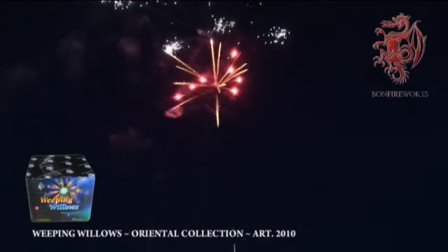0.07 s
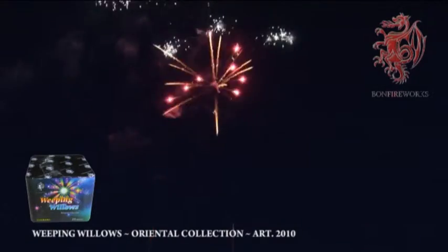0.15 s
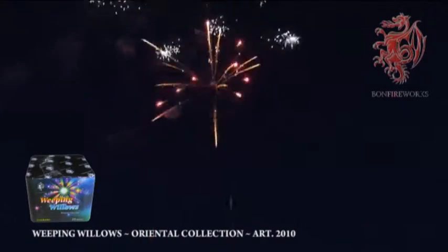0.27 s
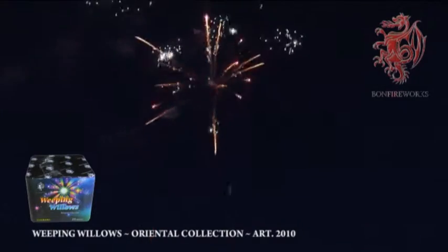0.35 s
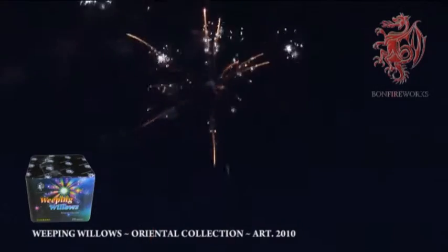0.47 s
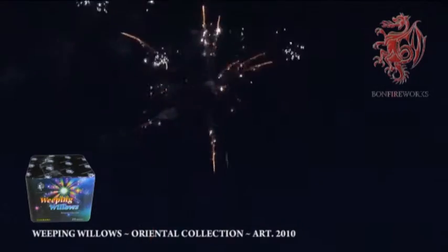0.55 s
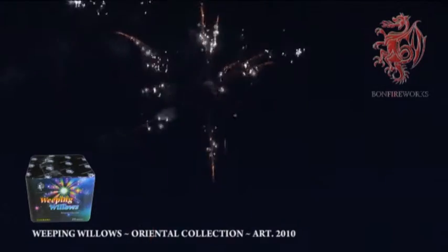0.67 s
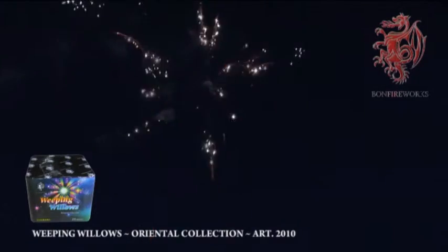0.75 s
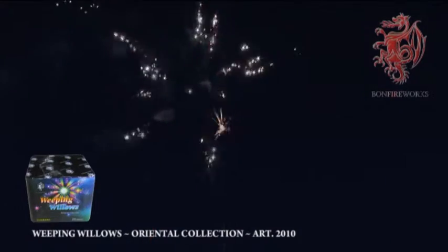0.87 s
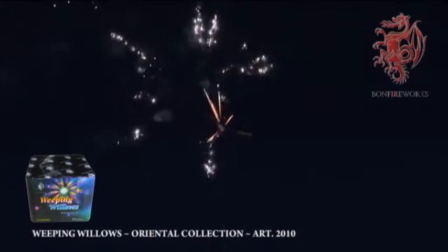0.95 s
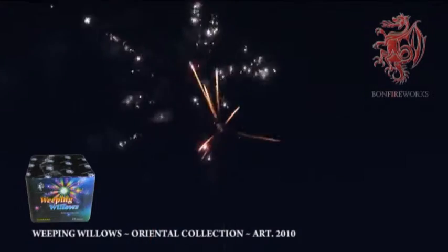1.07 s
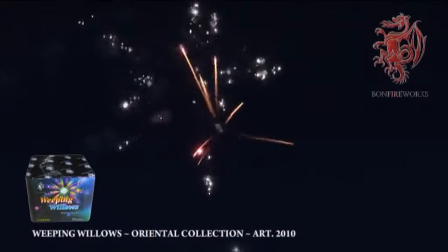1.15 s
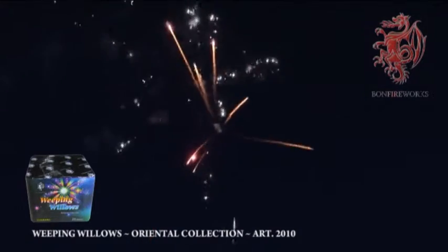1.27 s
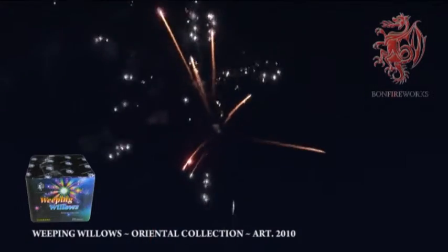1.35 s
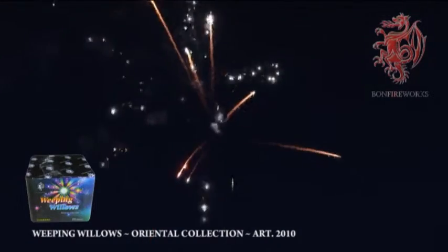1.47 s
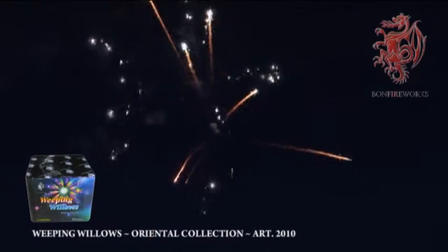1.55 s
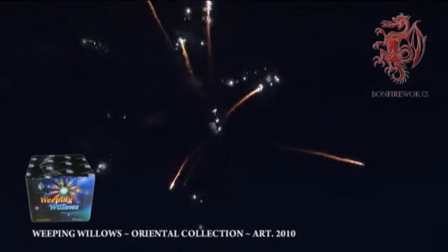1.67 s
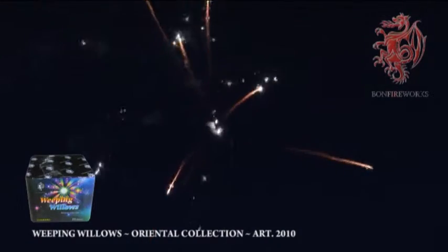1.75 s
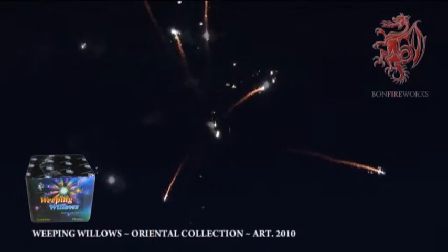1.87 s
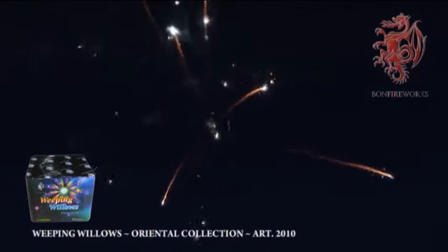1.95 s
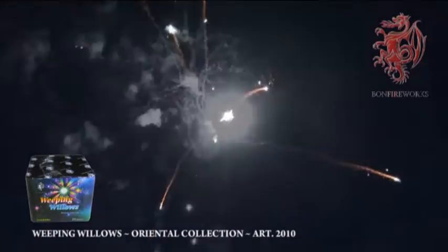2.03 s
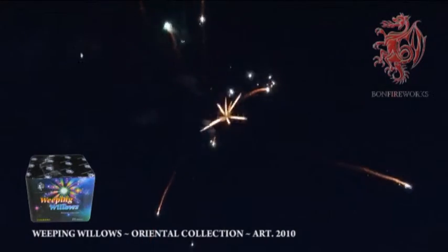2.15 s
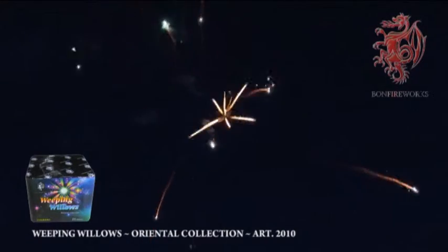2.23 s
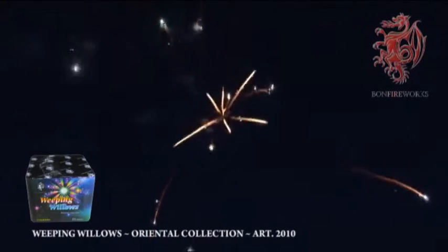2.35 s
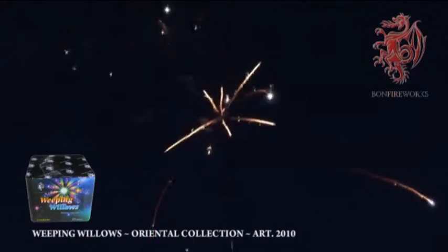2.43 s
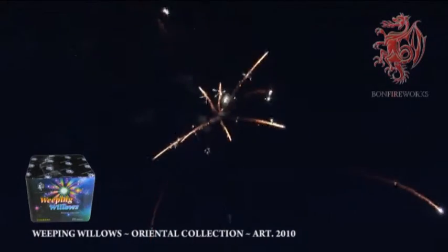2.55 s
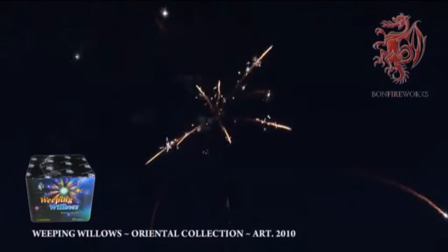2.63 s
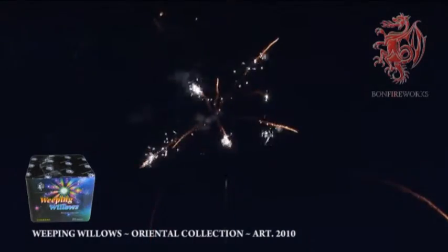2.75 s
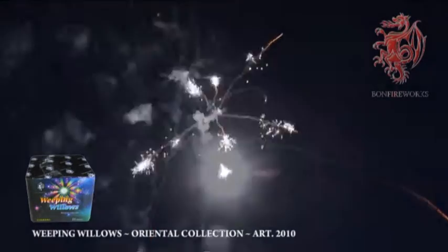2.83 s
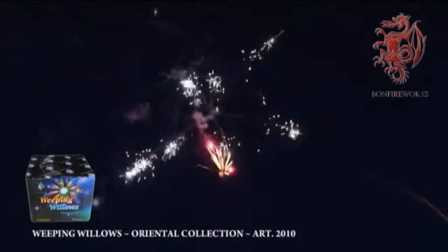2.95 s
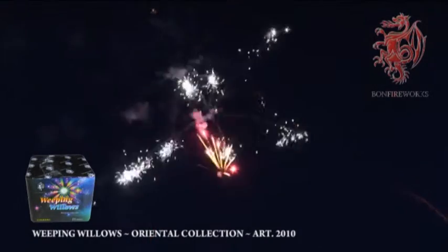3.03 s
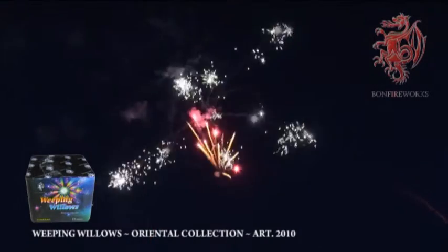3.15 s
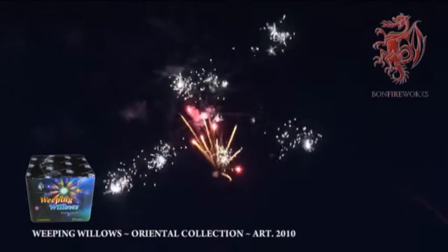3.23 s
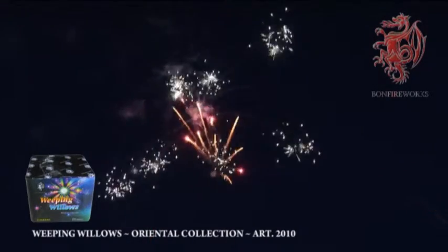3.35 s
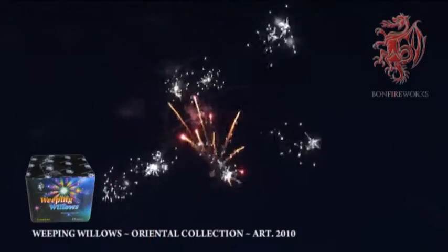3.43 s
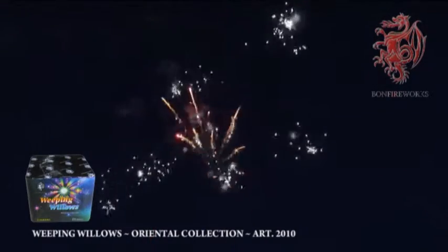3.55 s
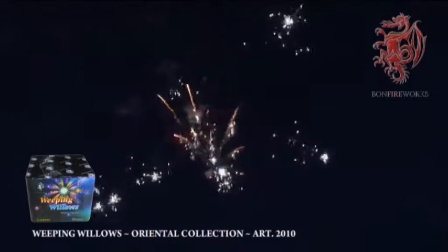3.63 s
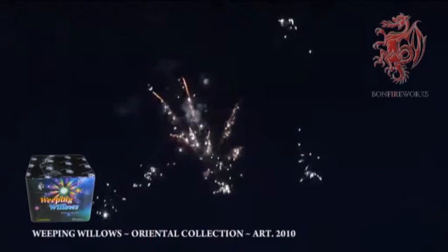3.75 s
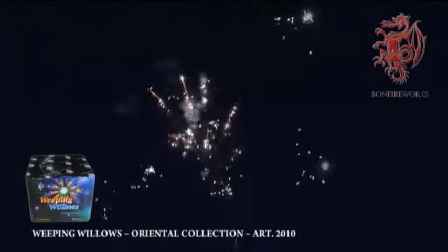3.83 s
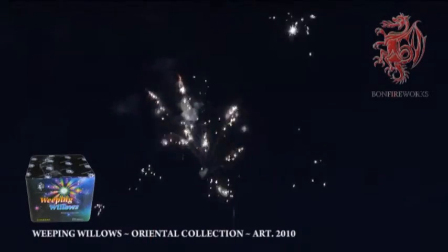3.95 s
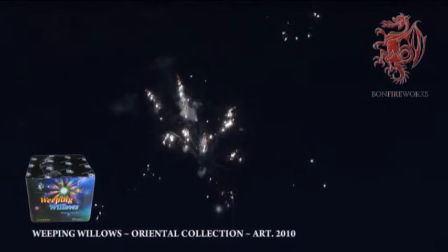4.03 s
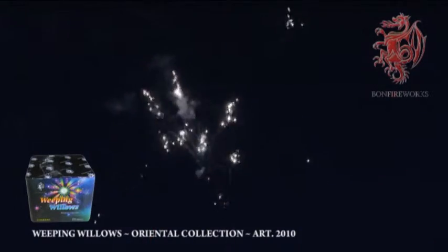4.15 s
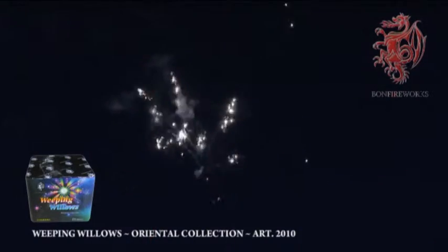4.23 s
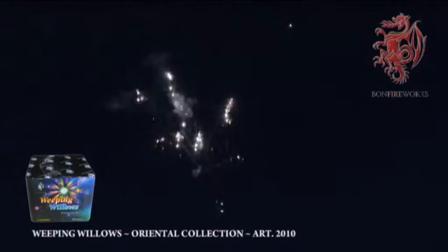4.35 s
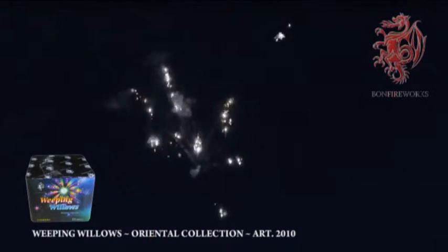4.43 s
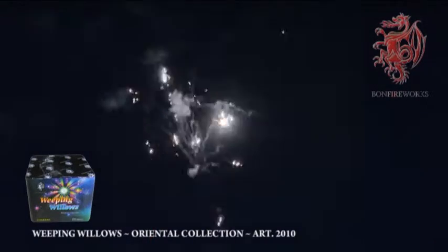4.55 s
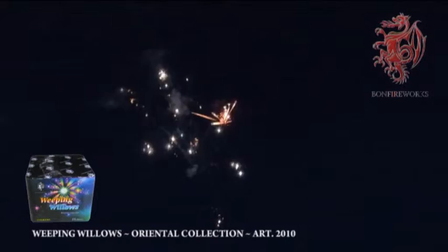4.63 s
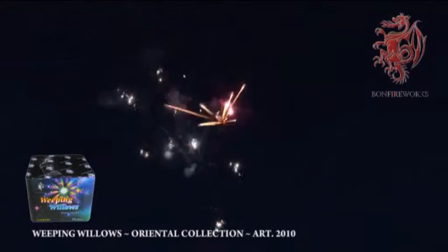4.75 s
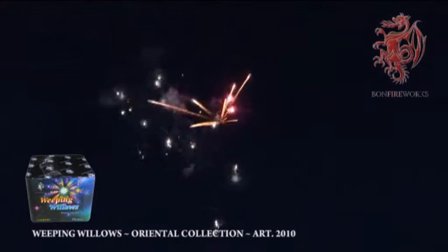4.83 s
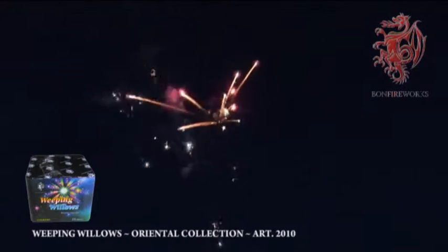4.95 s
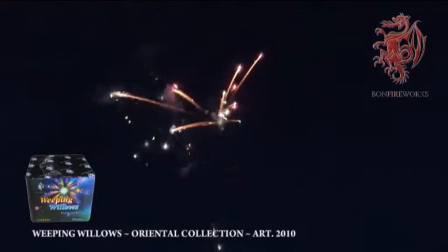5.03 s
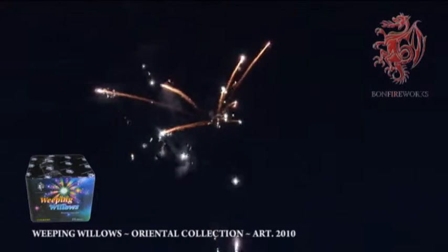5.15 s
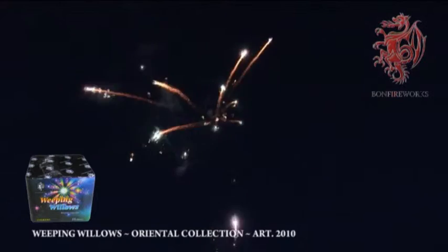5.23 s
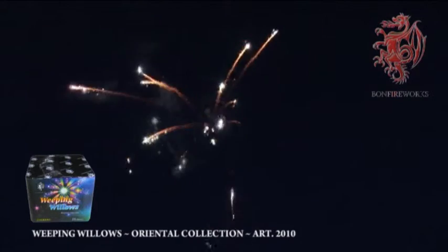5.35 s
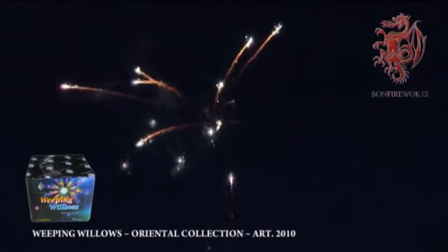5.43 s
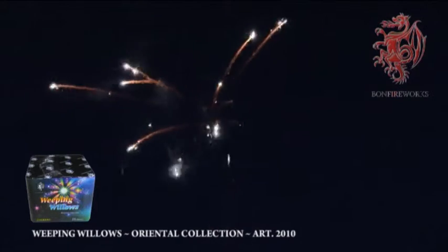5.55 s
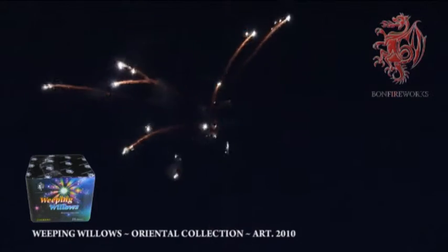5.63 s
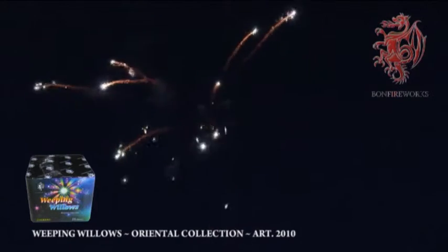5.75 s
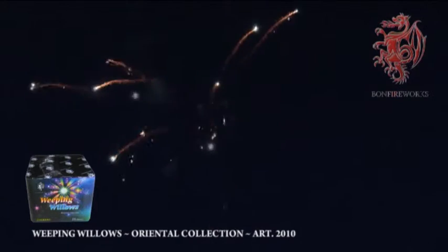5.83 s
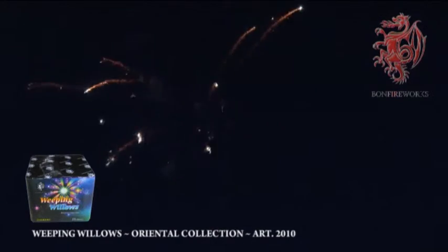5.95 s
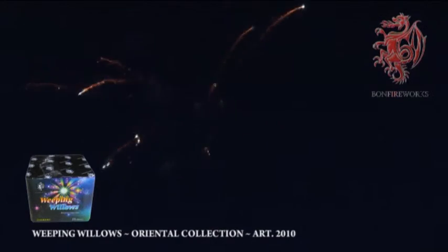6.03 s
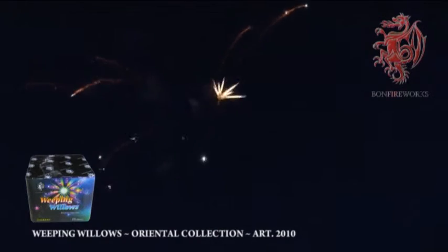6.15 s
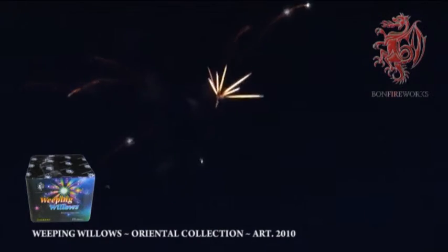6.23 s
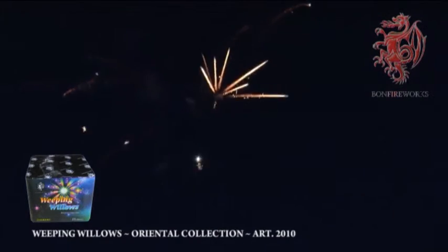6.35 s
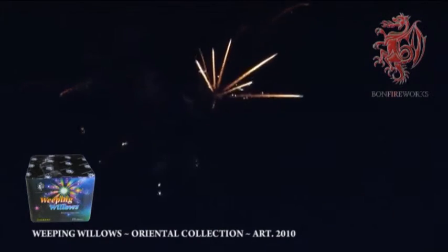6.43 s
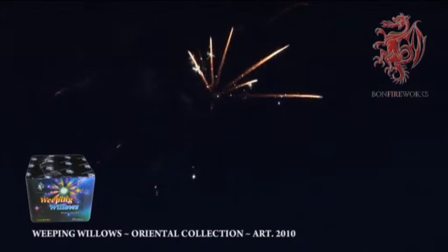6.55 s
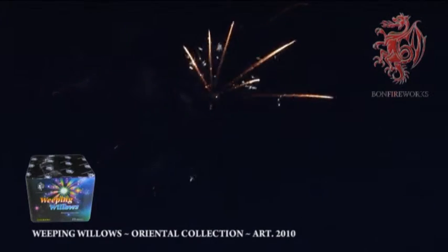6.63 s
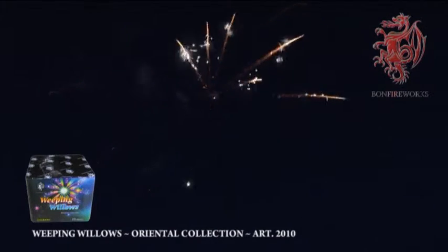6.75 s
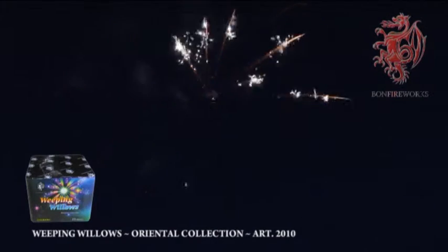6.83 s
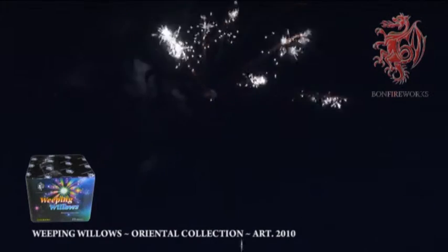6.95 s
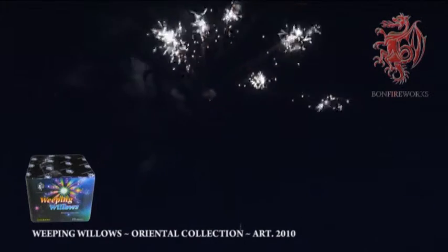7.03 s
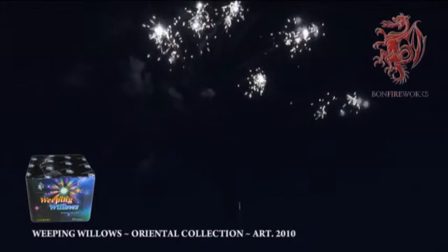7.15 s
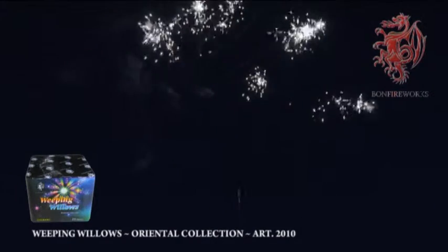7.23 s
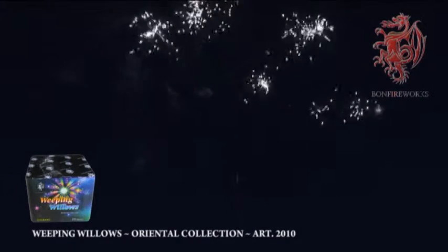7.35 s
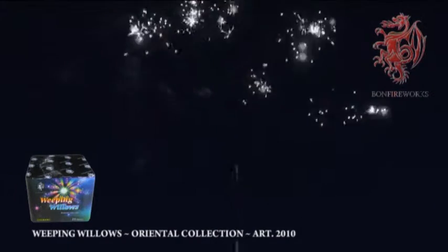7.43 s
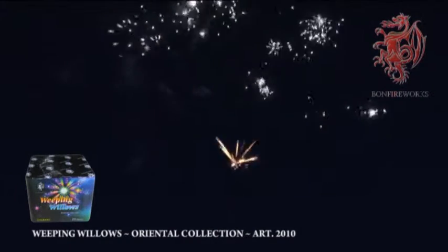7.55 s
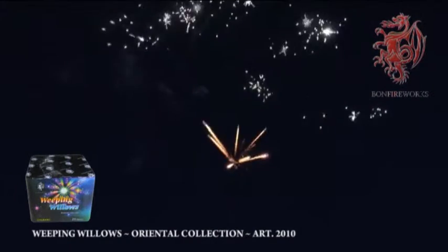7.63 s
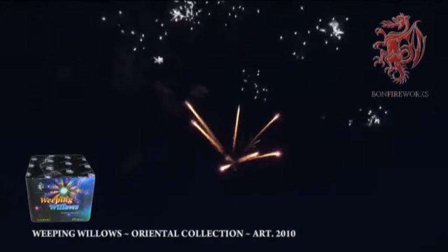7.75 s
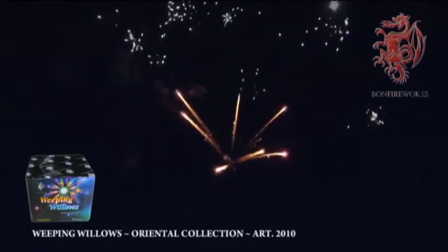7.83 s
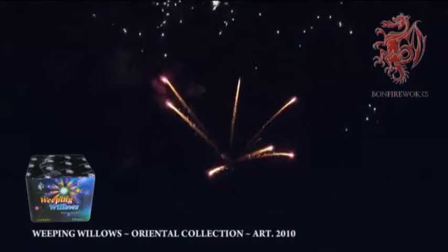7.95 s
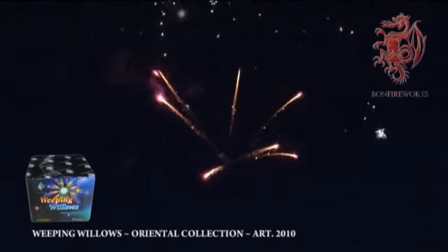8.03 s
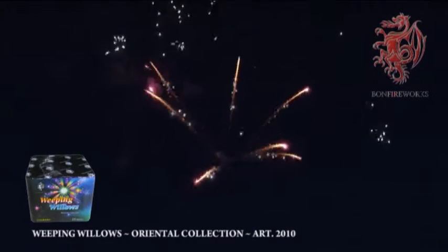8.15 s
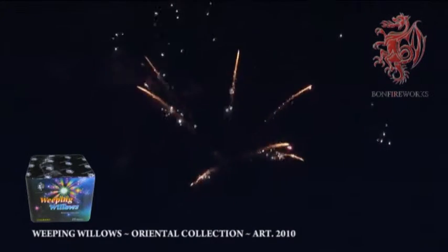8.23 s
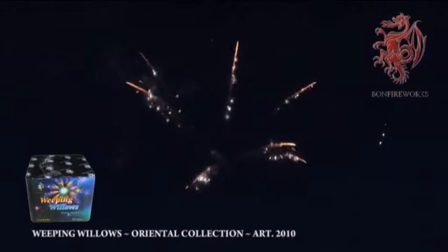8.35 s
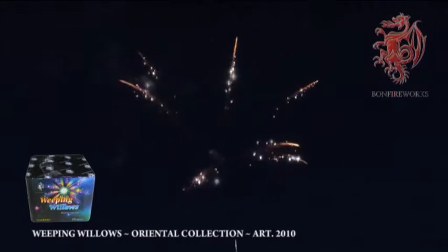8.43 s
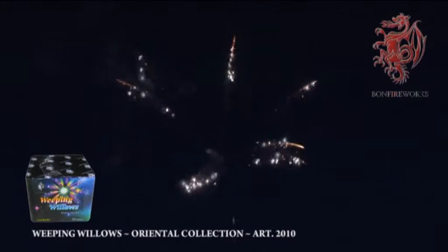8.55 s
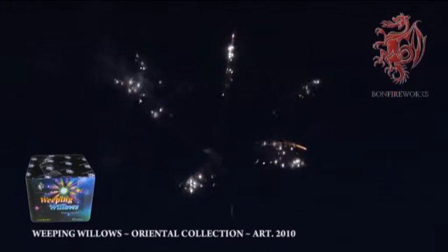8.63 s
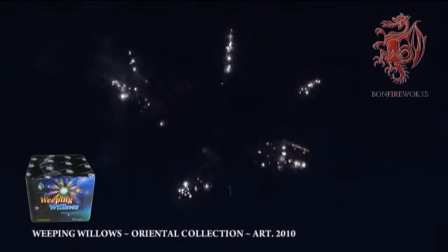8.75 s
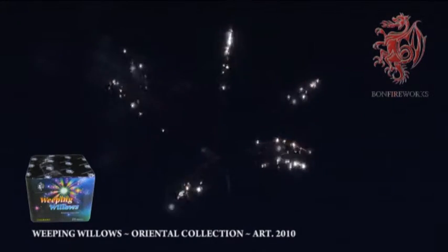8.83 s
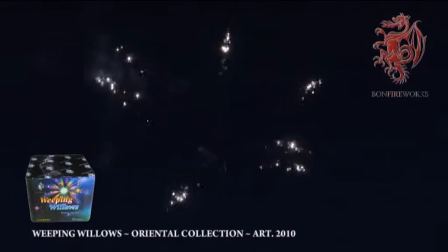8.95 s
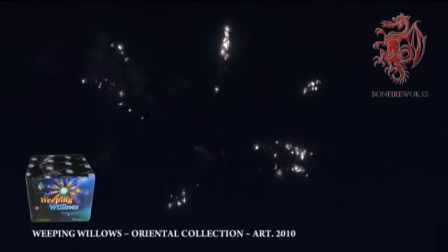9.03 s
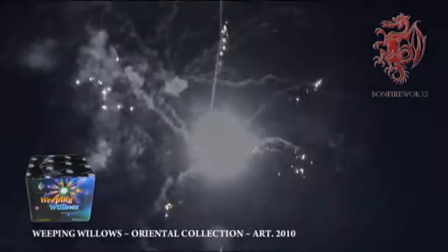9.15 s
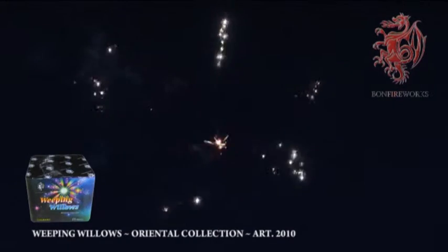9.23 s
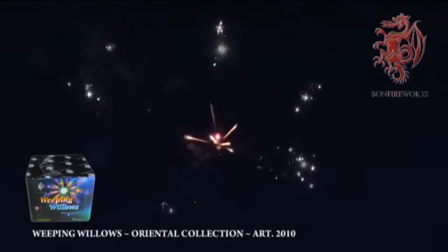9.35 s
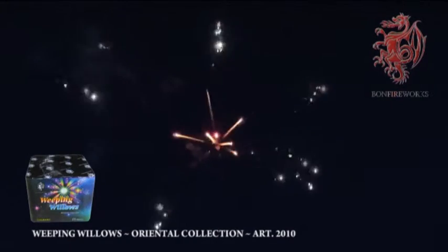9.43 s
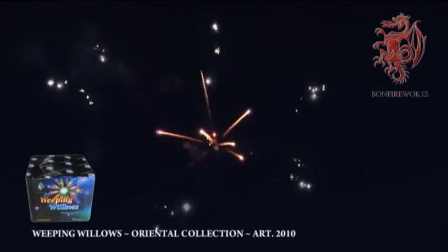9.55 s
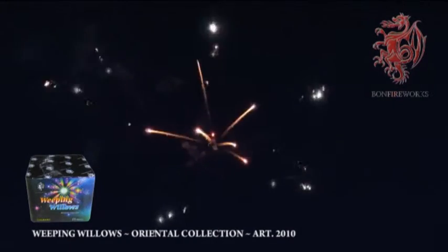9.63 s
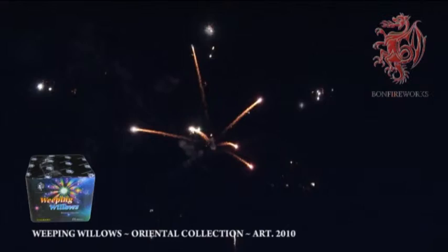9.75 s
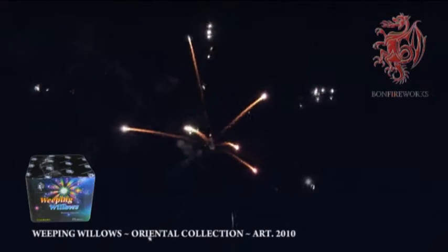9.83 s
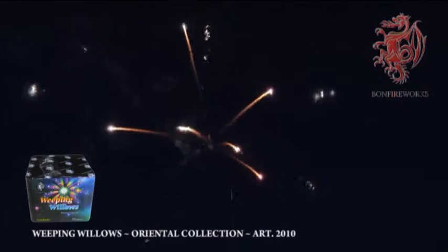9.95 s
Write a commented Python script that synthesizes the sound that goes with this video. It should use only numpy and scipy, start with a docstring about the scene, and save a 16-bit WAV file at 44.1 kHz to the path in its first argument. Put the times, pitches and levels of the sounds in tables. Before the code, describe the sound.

Quiet open air at night with faint low hum-like ambience and slight hiss. A shell bursts overhead almost at once, at 0.06 s, while an earlier echo is returning; crackling stars are thick until about 0.9. Further heavy bursts hit at 1.1, 2.3, 3.1, 4.8, 6.4, 7.8 and 9.5. Short, dry launch cracks with a thump come from the ground at 1.0, 2.2, 3.6, 4.9 (softer), 6.6, 8.2 and 9.5, the last almost together with a burst. Dense crackle over fine sizzle builds from 2.7, peaks near 3.4 and thins by 4.2; another builds from 6.8, peaks near 7.4 and fades by 8.1. Elsewhere there are lone pops and faint distant hissing. Every burst has an immediate ground slap, a short tree scatter, strong echoes about one and 1.4 seconds later, and low rumble. The small stereo microphone distorts and ducks on the strongest shocks.

```python
"""Firework cake at night

In open country, tubes launch shells, shells burst overhead and stars crackle, over quiet night air.
Bangs are sudden fronts with lengthening, decaying swings; crackle is many tiny fronts over a fused sizzle.
The ground and near trees answer at once, distant slopes and buildings for two seconds,
by delayed copies and shaped noise. A small stereo microphone overloads on the strongest shocks
and ducks briefly after them."""
import sys
import numpy as np
from scipy import signal
from scipy.fft import rfft, irfft, next_fast_len
from scipy.io import wavfile
from scipy.ndimage import uniform_filter1d

SR = 44100
rng = np.random.default_rng(int(sys.argv[2]) if len(sys.argv) > 2 else 0)


def int16_out(signal):
    """Quantize to a 16-bit WAV file."""
    q = np.round(np.clip(np.atleast_2d(signal).T, -1, 1) * 32767)
    wavfile.write(sys.argv[1], SR, q.astype(np.int16))


def gain_from_db(level_db):
    """Convert decibel levels to linear amplitude factors (20 dB per decade)."""
    decades = np.asarray(level_db, float) / 20
    return 10 ** decades


N = 440559

# Shell bursts, one just before the start. Each row: start in seconds, ground bounce delay in ms,
# far echo shift in ms, bounce level in dB, far echo level in dB.
BURSTS = [(-.62, 8, 0, 1.1, 2.2), (.0577, 8.1, -8, 3.5, -1), (1.132, 7.6, 6, 5.8, -.2),
          (2.3316, 8, 4, 4.8, -.6), (3.1255, 7, 8, 3.5, -3.3), (4.8463, 7.9, 0, 5, -.1),
          (6.3962, 8.3, 5, 3.5, -.1), (7.7741, 7.2, 6, 3, -1.5), (9.4853, 7.5, 4, 3.5, 1.8)]
# Launches from the tubes. Each row: start in seconds, muzzle crack level in dB, thump level in dB.
LAUNCHES = [(0.9907, 9.5, 1), (2.1738, 10.5, 2), (3.635, 8, -1.5), (4.9289, 3, 0), (6.6496, 11.5, 1.5),
            (8.173, 10.5, 0), (9.4745, 11, 6)]
# The loudest and the lone pops of the stars. Each row: start in seconds, level in dB before panning.
POPS = [(.2342, -4), (.2634, -3.4), (.2757, -3.9), (.304, -1.9), (.3457, -1.8), (.471, -1.2), (.5037, -1.2),
        (.6111, -3.8), (.6432, -1.5), (.7213, -4.2), (.745, -3.4), (.7836, -2.5), (.8348, -3.5),
        (.8434, -5.2), (.8686, -6.5), (.9066, -6.9), (.9264, -6.7), (1.0917, -8.8), (1.423, -12.7),
        (1.4793, -4.3), (2.2814, -3.6), (2.6988, -1.1), (2.7924, -5.7), (2.9096, -4.8), (2.9992, -.9),
        (3.0437, -4), (3.0524, -4.9), (3.0773, -.2), (3.1093, -2.6), (3.1166, -1.9), (3.2985, -3),
        (3.3315, -2.6), (3.386, -2.8), (3.4531, -1), (3.5099, -.3), (3.5764, .2), (3.6057, -2.3),
        (3.6225, -2.2), (3.7178, -2), (3.7449, -2), (3.8528, -1.1), (3.8837, -.1), (3.9497, -5.8),
        (3.959, -1.1), (3.9631, -3.9), (3.9964, 0), (4.0316, -2.1), (4.0989, -.6), (4.1397, -7.8),
        (4.1669, -1), (4.2351, 1.1), (4.356, -13.5), (4.3971, -5.5), (4.6329, -4.9), (4.6788, -11.8),
        (4.7825, -.6), (6.0661, -15.9), (6.1888, 1.1), (6.5572, -4.2), (6.8337, -8.9), (6.8784, -4.8),
        (6.9226, -6.3), (6.9525, -5.3), (7.0253, -3.7), (7.0549, 1.1), (7.0826, -1.4), (7.1223, -1.9),
        (7.1586, .8), (7.1891, .7), (7.2224, -.7), (7.2498, -.8), (7.3632, .9), (7.4049, .9), (7.4505, -.2),
        (7.5222, .3), (7.5776, .1), (7.5846, .1), (7.6027, -2.6), (7.7271, 1.2), (7.7439, -2.7),
        (7.7513, -1.4), (7.758, -4), (7.9144, -.8), (7.9442, -5.1), (7.9574, -.8), (7.9669, -2.9),
        (8.0099, -4.5), (8.0258, -2.8), (8.0604, -.1), (8.0753, -3.5), (8.128, -4.7), (8.2466, -11.4),
        (8.3526, -.8), (8.4046, -15)]
# Three strong swells of crackle and three faint hissing returns of it from the landscape.
# Each row: first in seconds, full from in seconds, full until in seconds, last in seconds, full level in dB.
SWARMS = [(-.5, .25, .6, 1.04, -25.5), (2.7, 3.24, 3.55, 4.25, -24), (6.8, 7.22, 7.58, 8.15, -24.5),
          (1.4, 1.85, 1.95, 2.15, -46), (4.8, 5.2, 5.35, 5.75, -42), (8.3, 9.3, 10., 10.4, -42)]
# Diffuse return of the landscape. Each row: delay in seconds, level in dB.
LANDSCAPE = [(.03, -29), (.1, -34), (.25, -37.5), (.75, -39), (.88, -32), (1., -27.5), (1.14, -30.5),
             (1.29, -39), (1.42, -35), (1.49, -45), (1.57, -38), (1.83, -50), (2.1, -48)]
# Slopes and woods that answer in a short roll. Each row: delay in seconds, top level in dB.
SLOPES = [(.473, -36), (.791, -35), (.902, -25), (.946, -16), (.988, -23.5), (1.03, -20.5), (1.167, -22),
          (1.19, -26), (1.362, -24), (1.64, -27.5), (1.951, -37), (2.098, -33.5)]
# Single walls that return a whole shock. Each row: delay in seconds, level in dB,
# low band edge in Hz, high band edge in Hz.
WALLS = [(.29, -17, 900, 4000), (0.321, -10, 80, 200), (.474, -14.5, 357, 2000), (.55, -16.5, 690, 4000),
         (.722, -18, 514, 3500), (0.843, -16, 920, 4000), (.946, -2.5, 338, 2500), (.988, -8.5, 298, 1800),
         (1.165, -26, 400, 2000), (1.19, -14, 298, 2470), (1.3, -14.5, 500, 3000), (1.325, -24, 500, 2500),
         (1.415, -5.5, 360, 930), (1.64, -11.5, 300, 1430)]
# Spectra of the burst and launch echoes, the crackle's far echoes, the sizzle, the late rumble
# and the night air. Each row: frequency in Hz, relative density in dB per Hz.
ECHO_COLOUR = [(35, -46), (60, -18.5), (108, -19), (216, -13.5), (413, -1.5), (554, 1), (935, -8),
               (1610, -11), (4140, -25.5), (9000, -61), (11700, -77), (19800, -120)]
FAR_AIR_COLOUR = [(200, -15), (700, -2), (2000, -6), (5000, -15.5), (12000, -28)]
SIZZLE_COLOUR = [(1000, -8), (3000, 3.5), (5000, 0), (9000, -16), (13000, -12), (15000, -21)]
RUMBLE_COLOUR = [(20, -68), (40, -22), (70, 0.5), (120, 1), (260, -18), (600, -49)]
NIGHT_COLOUR = [(18, -35), (30, -17), (85, 3), (216, 11.5), (346, -20), (680, 8), (928, 7), (1600, -1),
                (6360, -56), (12800, -39), (15000, -52)]

MS = .001  # seconds
AGES = np.arange(next_fast_len(int(2.2 * SR))) / SR  # seconds since a bang
NIGHT_DB, SHOCK_DB = -42, 11
ROLL_RISE_DB_PER_S, ROLL_FALL_DB_PER_S = 550, 400
# a swarm's ends against its full level, the shape of its slopes, the fall outside its ends
SWARM_ENDS_DB, SWARM_BEND, STRAGGLERS_DB_PER_S = -17, .7, 60
# nominal rate and top level of the big pops in a swarm at -24 dB; the swarm level where they begin
BIG_POPS_PER_S, BIG_TOP_DB, BIG_SPREAD_DB, BIG_FROM_DB = 230, -1.5, 14, -42
BUNCH_PER_S, BUNCH_DB = 25, 7  # pops come in bunches: how fast and how far their rate swings
OVERLOAD_MS, DUCK_ATTACK_S, DUCK_RELEASE_S = 1.6, .02, .1  # so much overload halves the gain


def band(x, lo_hz, hi_hz):
    """Band limitation: a gentle slope on either side of the passband."""
    return signal.sosfilt(signal.butter(2, [lo_hz, hi_hz], "band", fs=SR, output="sos"), x)


def noise(colour, size, width_db):
    """Spectral shaping: stereo noise with a mid of rms 1; width is side against mid."""
    hz, db = np.transpose(colour)
    bins_hz = np.fft.rfftfreq(size, 1 / SR)
    gain = gain_from_db(np.interp(np.log(bins_hz + 1), np.log(hz), db, right=-120))
    mid, side = irfft(rfft(rng.standard_normal((2, size))) * gain, size)
    side = gain_from_db(width_db) * side
    return np.array([mid + side, mid - side]) / mid.std()


def walk(rate, size):
    """Random modulation: normal levels, rate new ones a second, joined by ramps."""
    hold = int(SR / rate)
    steps = np.repeat(rng.standard_normal(size // hold + 1), hold)
    return uniform_filter1d(steps, hold)[:size]


def add(out, s, sound):
    """Superposition: mix a sound in at time s, which may lie before the start."""
    i = int(round(s * SR))
    sound = np.broadcast_to(sound, (2, sound.shape[-1]))[:, max(-i, 0):max(N - i, 0)]
    out[:, max(i, 0):max(i, 0) + sound.shape[1]] += sound


def shock(knee_ms, stretch, lead, decay_ms):
    """Blast wave: a sudden front, then swings that each last longer than the one before and die away."""
    ms = 1000 * AGES[:SR // 20]
    half_turns = np.log(1 + ms / knee_ms) / np.log(stretch) - lead
    return -np.cos(np.pi * half_turns) * np.exp(-ms / decay_ms)


def trees(db, t60, hi_hz):
    """Near scattering: leaves and fences close by return a short, wide, patchy tail."""
    ages = AGES[:SR // 4]
    tail = band(rng.standard_normal((2, len(ages))), 230, hi_hz)
    tail = tail + band(rng.standard_normal(len(ages)), 200, hi_hz)  # the part common to both sides
    decay = np.exp(-np.log(1000) * ages / t60)
    onset = np.minimum(ages / 0.00067, 1)
    return gain_from_db(db + 1.36 * walk(340, len(ages))) * decay * tail * onset


def landscape(shift_s, colour):
    """Diffuse reflection: scatterers return grainy noise under the delay profile, drawn anew each time."""
    delay, db = np.transpose(LANDSCAPE)
    ages = AGES - shift_s
    profile = np.interp(ages, delay, db, left=-90, right=-90)
    for late, top_db in SLOPES:
        roll = np.minimum(ROLL_RISE_DB_PER_S * (ages - late), ROLL_FALL_DB_PER_S * (late - ages))
        profile = np.maximum(profile, top_db + roll)
    level = gain_from_db(profile + 1.95 * walk(150, len(AGES)))
    balance = gain_from_db([[.6], [-.6]])
    return noise(colour, len(AGES), width_db=-7.5) * level * balance


def night_air():
    """Ambient noise: a steady coloured spectrum whose level wavers slightly."""
    return gain_from_db(NIGHT_DB + 0.52 * walk(9.8, N)) * noise(NIGHT_COLOUR, N, width_db=-11)


def launches():
    """Muzzle blast: a crack, the slower push of the gas column, and weaker echoes."""
    out = np.zeros((2, N))
    crack, thump = shock(.22, 2.1, .2, .36), -shock(.9, 2.6, .2, 1.2)
    for s, crack_db, thump_db in LAUNCHES:
        add(out, s, gain_from_db(crack_db) * crack)
        add(out, s + .7 * MS, gain_from_db(thump_db) * thump)
        add(out, s, trees(thump_db - 20.5, 0.033, 6000))
        add(out, s, gain_from_db(thump_db - 17) * landscape(0, ECHO_COLOUR))
    return out


def swarm(t):
    """Power summation: level in dB of swells that each thicken, hold, thin out and stop."""
    total = 1e-9
    for first, full, until, last, full_db in SWARMS:
        slope = np.maximum((full - t) / (full - first), (t - until) / (last - until))
        away = np.clip(slope, 0, 1)
        outside = np.maximum(np.maximum(first - t, t - last), 0)
        db = full_db + SWARM_ENDS_DB * away ** SWARM_BEND - STRAGGLERS_DB_PER_S * outside
        total = total + gain_from_db(db) ** 2
    return 10 * np.log10(total)


def sizzle():
    """Fusion: countless sparks too fine to tell apart become noise that follows the swarms."""
    level = gain_from_db(swarm(np.arange(N) / SR) - 14 + 5.3 * walk(120, N))
    return level * noise(SIZZLE_COLOUR, N, width_db=-15)


def small_pops():
    """Random thinning: the louder the swarm, the more candidate pops light. Gives times and sizes."""
    chance = rng.random((5000, 3))
    when = chance[:, 0] * (N - SR // 20) / SR
    swarm_db = swarm(when)
    lit = np.clip(12 * (gain_from_db(1.38 * (swarm_db + 26)) - .03 - chance[:, 1]), 0, 1)
    return when, lit * gain_from_db(-8.5 - 15 * chance[:, 2] + 0.85 * (swarm_db + 27.5))


def big_pops():
    """Bunched thinning: bigger grains pop faster and louder as a strong swarm thickens. Times and sizes."""
    chance = rng.random((3000, 3))
    when = chance[:, 0] * (N - SR // 20) / SR
    swarm_db = swarm(when)
    growth_db = .45 * (swarm_db + 24)
    bunch_db = BUNCH_DB * walk(BUNCH_PER_S, N)[(when * SR).astype(int)]
    share = BIG_POPS_PER_S * N / SR / len(chance) * gain_from_db(growth_db + bunch_db)
    share = share * np.clip((swarm_db - BIG_FROM_DB) / 3, 0, 1)
    lit = np.clip(30 * (share - chance[:, 1]), 0, 1)
    return when, lit * gain_from_db(BIG_TOP_DB + growth_db - BIG_SPREAD_DB * chance[:, 2])


def crackle():
    """Impulse trains: tiny shocks from stars across the sky, with ground bounce, echoes and sizzle."""
    small_s, small_sizes = small_pops()
    big_s, big_sizes = big_pops()
    listed_s, listed_db = np.transpose(POPS)
    when = np.r_[small_s, big_s, listed_s]
    sizes = np.r_[small_sizes, big_sizes, gain_from_db(listed_db)]
    place = rng.random((len(when), 3))
    pan = gain_from_db(1.33 * (place[:, 0] - .5) * np.array([[1], [-1]]))
    # stars far to one side reach one port a sample sooner
    lag = np.round(1.2 * (place[:, 0] - .5)).astype(int)
    grain = (3 * place[:, 1]).astype(int)
    bounce_delay = ((5 + 4 * place[:, 2]) * MS * SR).astype(int)
    direct, bounce = np.zeros((2, 3, N)), np.zeros((2, N))
    at = (when * SR).astype(int) - 1
    for side in range(2):
        np.add.at(direct[side], (grain, at + side * lag), sizes * pan[side])
        np.add.at(bounce[side], at + bounce_delay, sizes * pan[side])
    # larger grains of powder give longer shocks
    fronts = [shock(0.078 * k, 2.263, 0.33, 0.27 * k) for k in (.75, 1.05, 1.35)]
    pops = sum(signal.oaconvolve(direct[:, k], fronts[k][None])[:, :N] for k in range(len(fronts)))
    bounced = signal.oaconvolve(bounce, fronts[2][None])[:, :N]
    pops = pops + gain_from_db(-15.5) * band(bounced, 160, 2400)
    near = signal.oaconvolve(pops, trees(-39.5, .1, 13500), axes=1)[:, :N]
    # air takes the treble from the long way round
    far = signal.oaconvolve(pops, landscape(0, FAR_AIR_COLOUR), axes=1)[:, :N]
    return pops + near + sizzle() + gain_from_db(-42.5) * far


def bursts():
    """Shock and reflection: a front, its ground bounce, near tail, far echoes and a late low rumble."""
    out = np.zeros((2, N))
    front, heave = shock(0.4, 2.204, 0.18, 1.62), shock(3.2, 3.13, 0.017, 8.)
    walls = [(delay, gain_from_db(db) * band(front, lo_hz, hi_hz)) for delay, db, lo_hz, hi_hz in WALLS]
    swell = AGES / 0.69 * np.exp(1 - AGES / 0.68)
    balance_db = np.array([[1.5], [-1.5]])
    for s, bounce_ms, shift_ms, bounce_db, far_db in BURSTS:
        bounce_s = s + bounce_ms * MS
        add(out, s, gain_from_db(SHOCK_DB) * front + gain_from_db(SHOCK_DB - 17) * heave)
        add(out, bounce_s, gain_from_db(bounce_db) * uniform_filter1d(front, size=5))  # soft soil dulls the edge
        add(out, s, trees(-15, .03, 3000))
        add(out, bounce_s, trees(-10.5, 0.084, 3330))
        add(out, s, gain_from_db(far_db) * landscape(shift_ms * MS, ECHO_COLOUR))
        # each wall sees the burst from its own angle
        for (delay, echo), (late, gain) in zip(walls, rng.standard_normal((len(WALLS), 2))):
            echo_s = s + delay + (shift_ms + 1.106 * late) * MS
            add(out, echo_s, gain_from_db(far_db + 2 * gain + balance_db) * echo)
        rumble = swell * noise(RUMBLE_COLOUR, len(AGES), width_db=-17.5)
        add(out, s, gain_from_db(-46.5 + 3.1 * walk(24.7, len(AGES))) * rumble)
    return out


def scene():
    """Superposition: all sources over the quiet night air."""
    return night_air() + launches() + crackle() + bursts()


def duck(x):
    """Gain control: overload charges a store that turns the gain down and drains away."""
    store = np.maximum(np.abs(x).max(axis=0) - 1, 0) / (MS * SR)
    store = signal.lfilter([1], [1, -np.exp(-1 / (DUCK_RELEASE_S * SR))], store)
    keep = np.exp(-1 / (DUCK_ATTACK_S * SR))
    return x / (1 + signal.lfilter([1 - keep], [1, -keep], store) / OVERLOAD_MS)


def roll_off(x):
    """The treble ends steeply here."""
    return signal.sosfilt(signal.butter(12, 16380, fs=SR, output="sos"), x)


def record(dry):
    """Transduction: the capsule rounds fronts and dips in the treble; the amplifier ducks, hisses, bends, clips."""
    capsule = band(dry, 36, 12100) - 0.18 * band(dry, 8660, 9800)
    # most of the hiss is common to both sides
    hiss = rng.standard_normal(dry.shape) + 3.8 * rng.standard_normal(N)
    hiss = gain_from_db(-73.5) * band(hiss, 4300, 12500)
    lowpass = signal.ellip(8, .2, 60, 15500, fs=SR, output="sos")
    limited = signal.sosfilt(lowpass, duck(capsule) + hiss)
    bent = 1.7 * np.tanh(limited / 1.6)
    mix = np.clip(bent, -.995, .995)
    return roll_off(mix)


dry = scene()
out = record(dry)
int16_out(out)
```